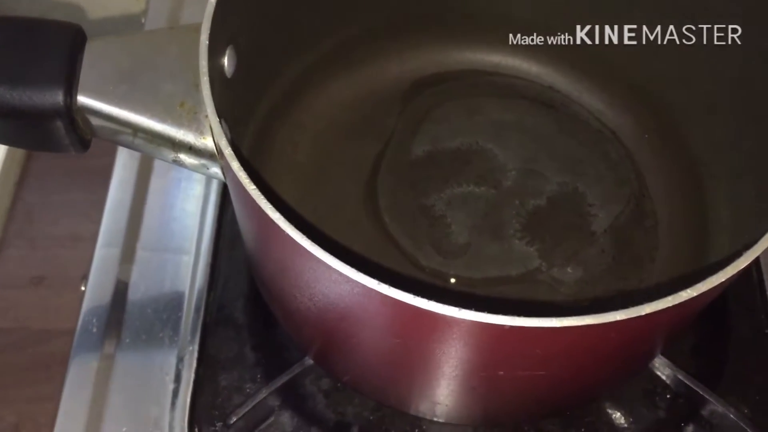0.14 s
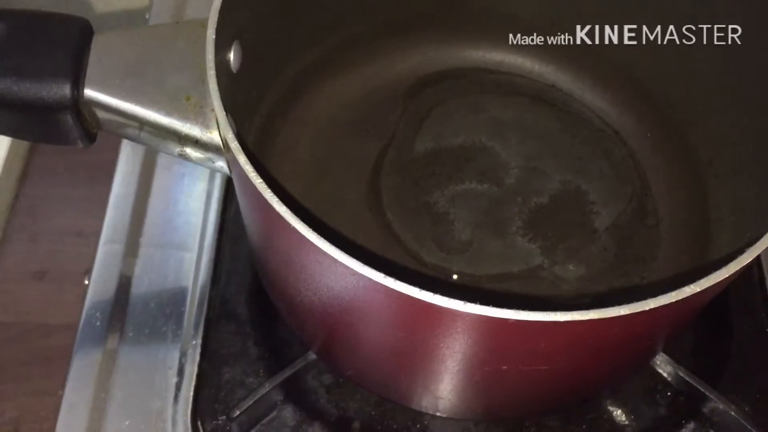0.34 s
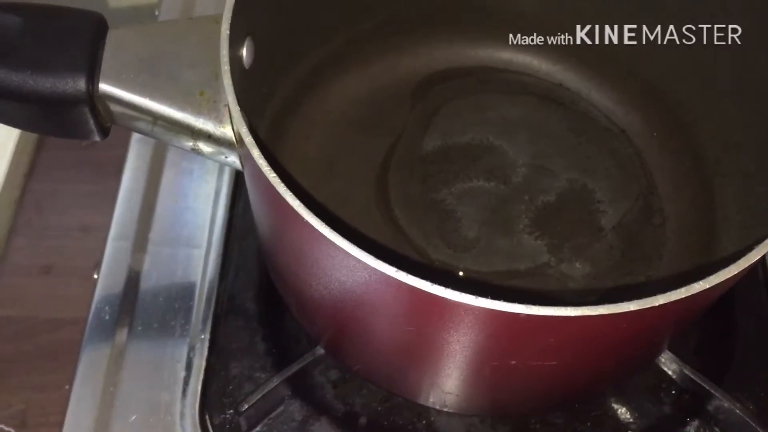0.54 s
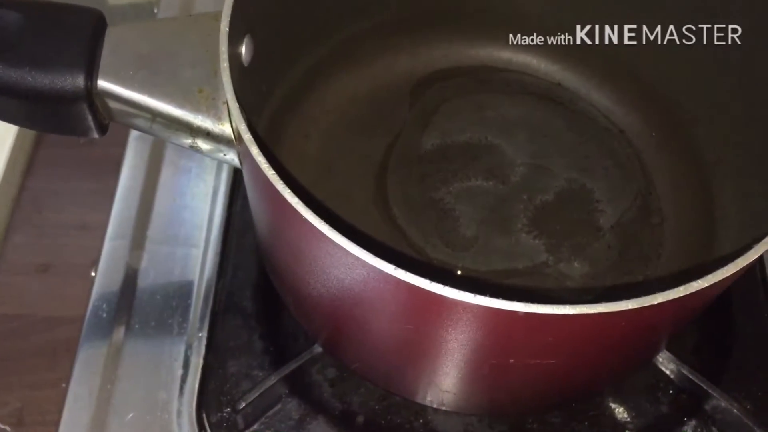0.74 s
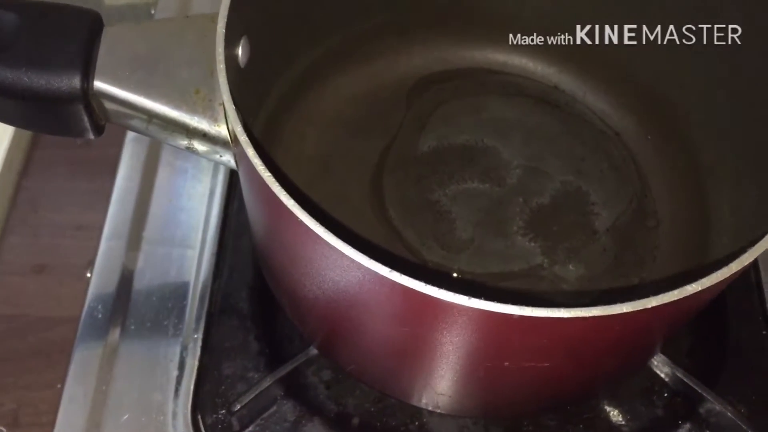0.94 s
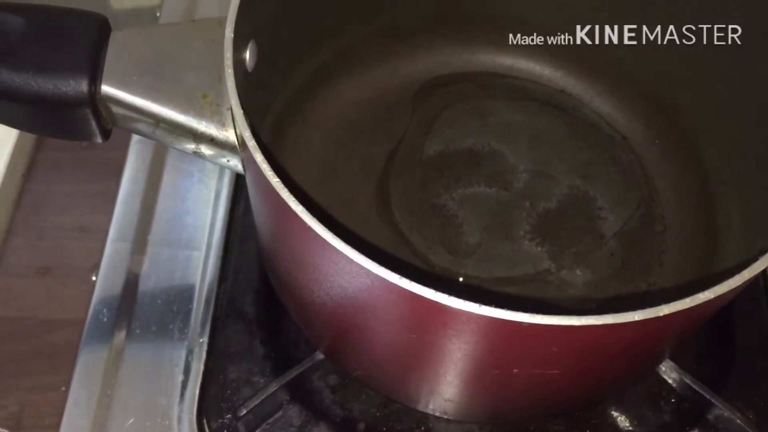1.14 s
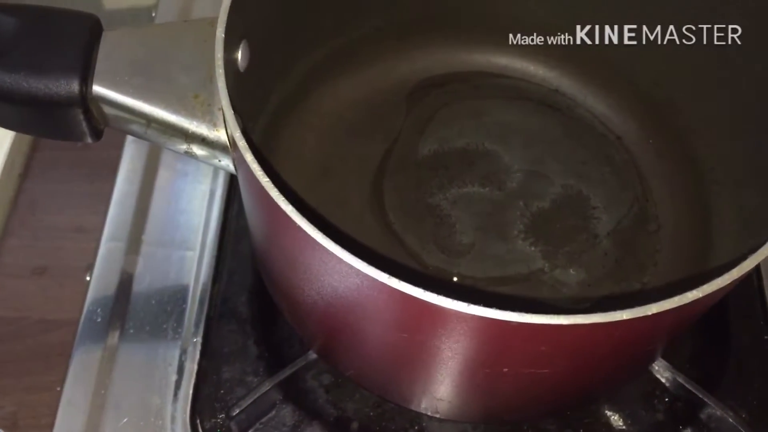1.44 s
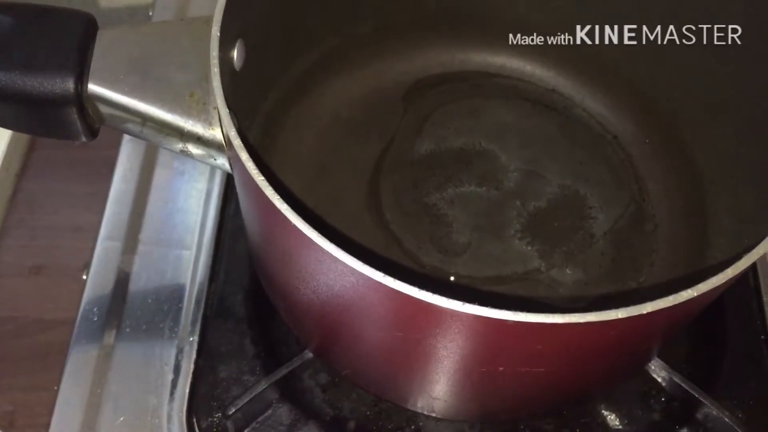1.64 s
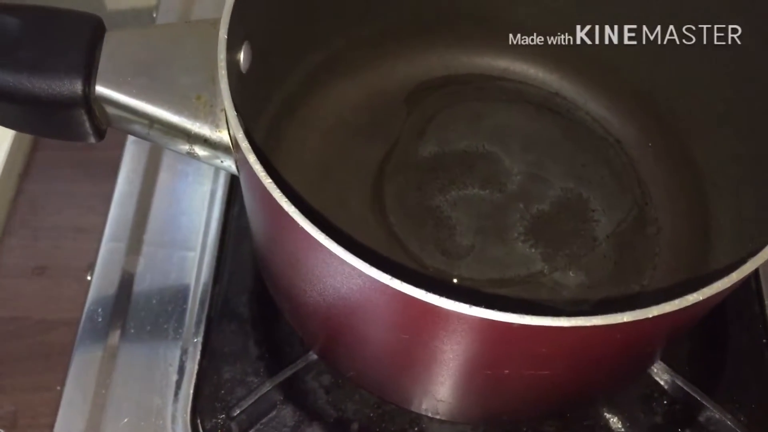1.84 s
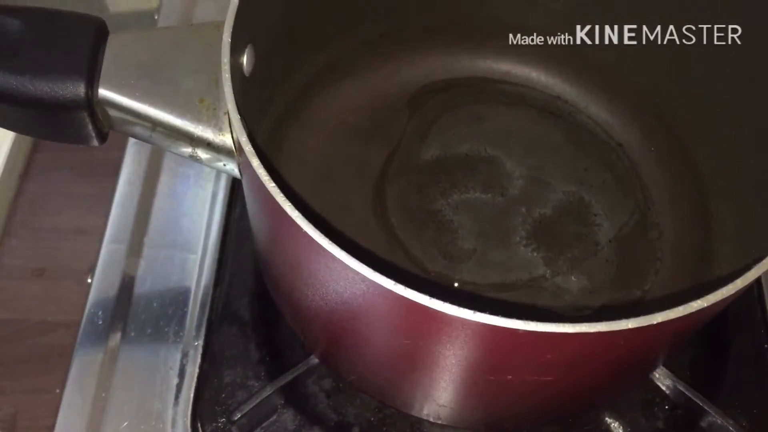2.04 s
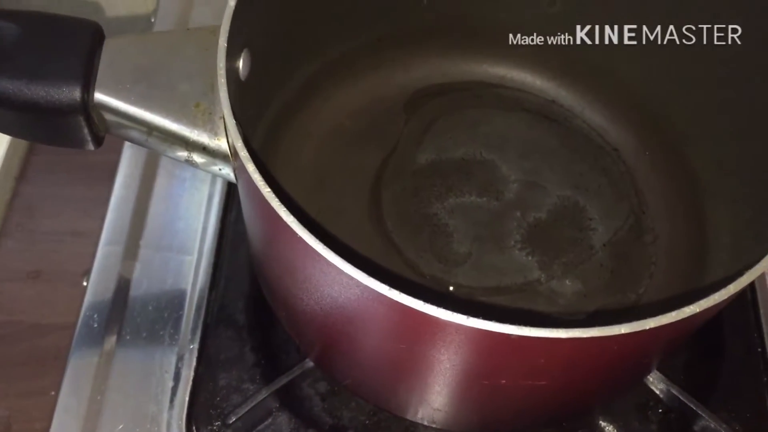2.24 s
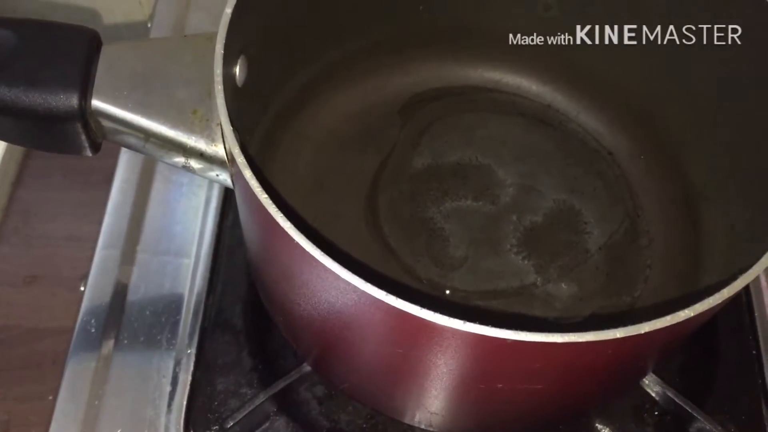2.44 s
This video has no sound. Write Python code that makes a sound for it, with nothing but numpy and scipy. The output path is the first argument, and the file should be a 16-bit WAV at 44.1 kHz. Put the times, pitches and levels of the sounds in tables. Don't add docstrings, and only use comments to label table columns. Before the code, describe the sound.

Low, booming gas flame roar beneath a pan of oil, with a few dry ticks and one metallic rattle

```python
import sys
import numpy as np
from scipy import signal
from scipy.io import wavfile
from scipy.ndimage import uniform_filter1d

SR = 44100
rng = np.random.default_rng(int(sys.argv[2]) if len(sys.argv) > 2 else 0)


def makeup_ratio(level_db):
    decades = np.asarray(level_db, float) / 20
    return 10 ** decades


def bounce(signal):
    frames = np.transpose(np.atleast_2d(signal))
    limited = np.clip(frames, -1, 1)
    pcm = np.round(limited * 32767).astype(np.int16)
    wavfile.write(sys.argv[1], SR, pcm)


N = 114660

# time_s, level_db
FLAME_LEVEL = [(0, -37.5), (.2, -33), (.33, -35), (.46, -33), (.68, -34.5), (.9, -34), (1.15, -33.5),
               (1.33, -35), (1.47, -33), (1.56, -31), (1.7, -29), (1.8, -38.5), (2.05, -32), (2.3, -35.5),
               (2.45, -36.5), (2.6, -37.5)]
# pitch_hz, width_hz, level_db
BOOM_MODES = [(100.95, 8.6, -1.5), (115.1, 8.4, -0.5), (136.1, 14.8, -2), (147.7, 12.6, -6.5),
              (170.9, 11.4, -9.5), (185.2, 13.3, -14.5), (199.6, 8.4, -10), (229, 17, -17.5),
              (245, 28, -21)]
# pitch_hz, width_hz, level_db
HOLLOW_MODES = [(300.5, 9.2, -64.5), (340.6, 9.8, -58), (356.4, 14, -58), (401.8, 12.5, -61.5),
                (510.3, 17.5, -63.5), (549, 21, -65), (614.8, 9.1, -59.5), (634, 13.3, -61.5),
                (745.8, 15.3, -64), (812, 19, -64.5), (923, 15, -67.5), (1043, 27, -64), (1377, 86, -58),
                (1758, 250, -60.5)]
# pitch_hz, density_db (per Hz)
ROAR_COLOUR = [(150, -9), (230, -4.5), (450, -10.5), (1100, -14), (2100, -16.5), (2600, -26), (4000, -33),
               (5200, -43.5)]
# pitch_hz, density_db (per Hz)
HISS_COLOUR = [(3500, -12), (4930, -4.5), (6300, -2.5), (7450, -8), (8750, -7), (10400, -13), (11700, -11),
               (15750, -15.5)]
# start_s, peak_db, centre_hz, width_hz
OIL_POPS = [
    (.1236, -52.5, 15500, 2500),
    (.1254, -38, 7000, 7000),
    (.1262, -44, 15500, 3000),
    (.1275, -48, 12000, 6000),
    (.2012, -58, 14800, 3000),
    (1.4536, -50.5, 4100, 1500),
    (1.4548, -31, 1300, 1480),
    (1.7824, -48.5, 15100, 3500),
    (1.7843, -32, 13600, 6000),
    (1.7847, -49, 9000, 3000),
]
# pitch_hz, level_db, t60_s
RIM_MODES = [(6180, -48, 0.02), (8220, -42, .018), (8500, -53, 0.025), (8950, -50.5, 0.039),
             (10100, -48, .012)]
# start_s, level_db
GRATE_BLOWS = [
    (1.2061, 2),
    (1.2155, -7),
    (1.2215, -36),
    (1.2265, -7),
    (1.2336, -17),
    (1.2384, -13),
    (1.2443, -8.5),
    (1.2515, -12),
    (1.2575, -15),
    (1.272, -9),
]
# pitch_hz, level_db, t60_s
GRATE_MODES = [(1300, -40, 0.033), (1724, -43, 0.05), (2070, -43, 0.043), (3056, -42, .02),
               (3290, -35, 0.017), (3450, -36.5, 0.022), (3750, -49, 0.032), (4120, -48, 0.062)]
# pitch_hz, density_db (per Hz)
RUMBLE_COLOUR = [(15, -46), (24, -28), (36, -9), (47, -1), (58, -2.5), (68, -1), (90, -4), (120, -25)]
# time_s, level_db
HAND_LEVEL = [(0, -54), (.3, -48), (.6, -51), (.8, -57.5), (.9, -39), (1.2, -50), (1.4, -50), (1.58, -54),
              (1.68, -51.5), (2.2, -56), (2.35, -45), (2.6, -52)]


def flame():
    level_db = over_time(FLAME_LEVEL)
    swing_db = level_db - level_db.mean()
    return makeup_ratio(level_db) * boom() + makeup_ratio(0.16 * swing_db) * (hollow() + roar()) + makeup_ratio(0.064 * swing_db) * hiss()


def boom():
    push = rng.standard_normal(N + SR // 2)
    total = 0
    for k, (hz, width, db) in enumerate(BOOM_MODES):
        mode = resonate(resonate(push, hz, width), hz, 3.06 * width)
        total = total + (-1) ** k * makeup_ratio(db) * evened(mode)
    return steadied(total[-N:], 0.14)


def hollow():
    push = rng.standard_normal(N + SR // 2)
    total = 0
    for hz, width, db in HOLLOW_MODES:
        mode = resonate(resonate(push, hz, width), hz, 2 * width)
        total = total + makeup_ratio(db) * evened(mode)
    return total[-N:]


def roar():
    return makeup_ratio(-48) * kitchen(turbulence(ROAR_COLOUR, patchy_db=2.14, flicker_db=1.25, size=512))


def hiss():
    return makeup_ratio(-71.5) * turbulence(HISS_COLOUR, patchy_db=0.3, flicker_db=2.44, size=256)


def pops():
    out = np.zeros(N)
    t = np.arange(4096) / SR
    tail_db, tail_t60_s = -27, 0.1
    for start_s, db, hz, width in OIL_POPS:
        drive = 0.52 * makeup_ratio(tail_db - 60 * t / tail_t60_s) * rng.standard_normal(len(t))
        drive[0] = 1
        pop = resonate(resonate(resonate(drive, hz, width), hz, width), hz, 1.3 * width)
        out[round(start_s * SR):][:len(t)] += makeup_ratio(db) * pop / abs(pop).max()
    return out


def rim_tick():
    return ring(0.0425, RIM_MODES)


def grate_clink():
    out = np.zeros(N)
    for k, (start_s, blow_db) in enumerate(GRATE_BLOWS):
        shake_db = rng.uniform(-10.5, 5, len(GRATE_MODES))
        if k == 0:
            shake_db[:] = 0
        modes = [(hz, db + d, t60) for (hz, db, t60), d in zip(GRATE_MODES, shake_db)]
        out += makeup_ratio(blow_db) * ring(start_s, modes)
    return out


def ring(start_s, modes):
    contact_s = 0.00048
    t = np.maximum(np.arange(N) / SR - start_s, 0)
    total = np.zeros(N)
    for hz, db, t60 in modes:
        decay = makeup_ratio(db - 60 * np.minimum(t / t60, 4))
        total += decay * np.sin(2 * np.pi * (hz * t + rng.random()))
    return (1 - np.exp(-t / contact_s)) ** 2 * total


def hand():
    rumble = turbulence(RUMBLE_COLOUR, patchy_db=3, flicker_db=1, size=8192)
    return makeup_ratio(over_time(HAND_LEVEL)) * steadied(rumble, 0.22)


def kitchen(x):
    t60_s, tail_db = 0.25, -1
    t = np.arange(SR // 2) / SR
    tail = rng.standard_normal(len(t)) * makeup_ratio(-60 * t / t60_s)
    tail /= np.linalg.norm(tail)
    running = np.concatenate([x[-len(t):], x])
    wet = signal.oaconvolve(running, tail)[len(t):][:N]
    return evened(x + makeup_ratio(tail_db) * wet)


def turbulence(colour, patchy_db, flicker_db, size):
    frames = 4 * N // size + 5
    hz = np.fft.rfftfreq(size, 1 / SR)
    a, b, patches = rng.standard_normal((3, len(hz), frames))
    patches = uniform_filter1d(patches, size=len(hz) // 32, axis=0)
    patches = evened(uniform_filter1d(patches, size=8, axis=1))
    flicker = evened(uniform_filter1d(rng.standard_normal(frames), size=3))
    f, db = np.transpose(colour)
    colour_db = np.interp(np.log(hz + 1), np.log(f + 1), db, left=-90, right=-90)
    z = (a + 1j * b) * makeup_ratio(colour_db[:, None] + patchy_db * patches + flicker_db * flicker)
    return evened(signal.istft(z, nperseg=size, noverlap=3 * size // 4)[1][:N])


def resonate(x, hz, width):
    r = np.exp(-np.pi * abs(width) / SR)
    turn = np.exp(2j * np.pi * hz * np.arange(len(x)) / SR)
    return 2 * (turn * signal.lfilter([1 - r], [1, -r], x / turn)).real


def steadied(x, s):
    window = np.hanning(round(s * SR))
    power = signal.oaconvolve(x ** 2, window / window.sum(), "same")
    return x / np.sqrt(power + 1e-3 * np.mean(x ** 2))


def evened(x):
    return x / np.sqrt(np.mean(x ** 2) + 1e-20)


def over_time(points):
    t, value = np.transpose(points)
    return np.interp(np.arange(N) / SR, t, value)


def scene():
    return (flame() + pops() + rim_tick() + grate_clink() + hand())[None]


def low_pass(x):
    return signal.sosfilt(signal.butter(12, 16520, fs=SR, output="sos"), x)


def record(dry):
    edge = signal.firwin(255, 16500, window=("kaiser", 9), fs=SR)
    limited = signal.oaconvolve(dry, edge[None], "same")
    return low_pass(limited)


dry = scene()
out = record(dry)
bounce(out)
```